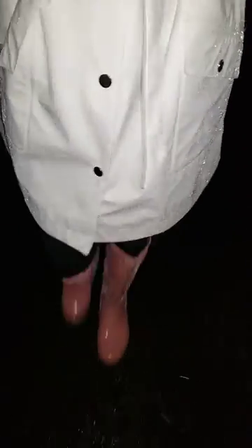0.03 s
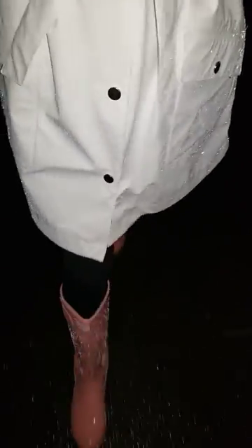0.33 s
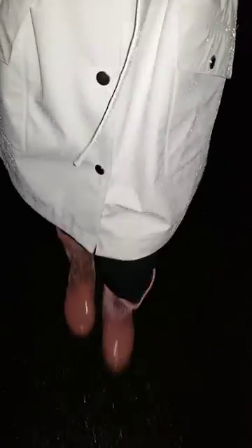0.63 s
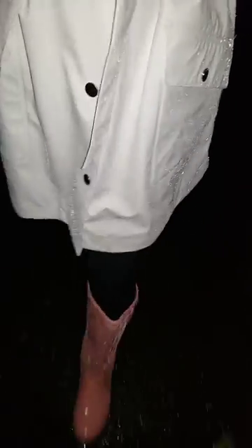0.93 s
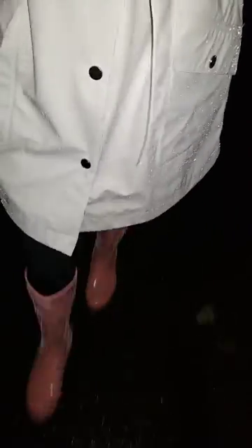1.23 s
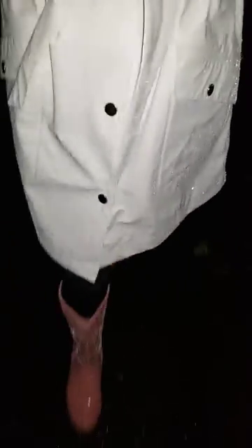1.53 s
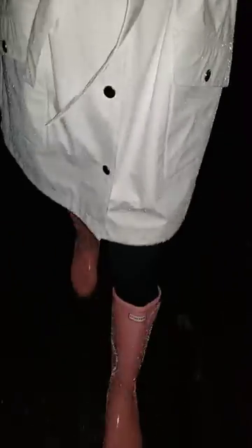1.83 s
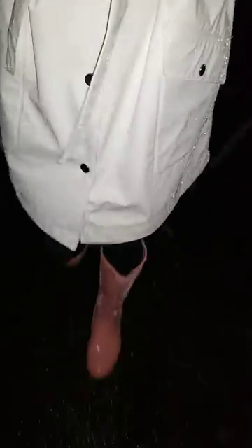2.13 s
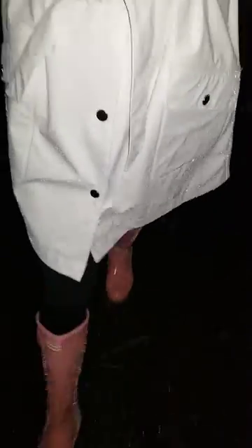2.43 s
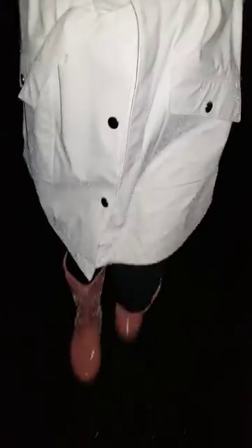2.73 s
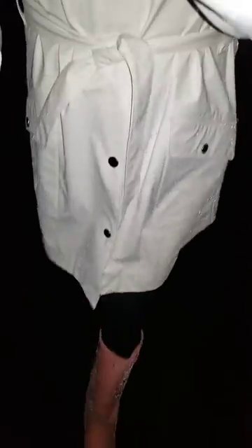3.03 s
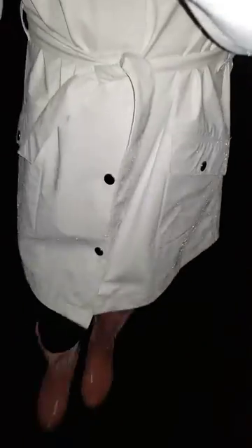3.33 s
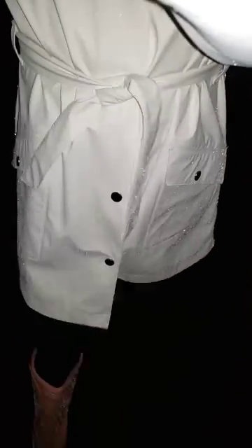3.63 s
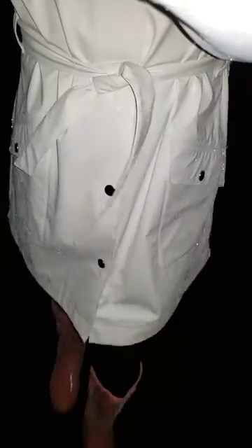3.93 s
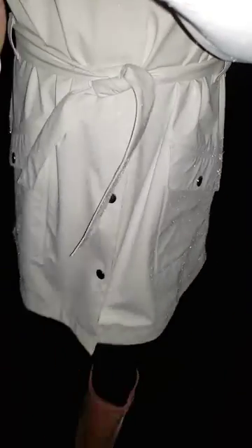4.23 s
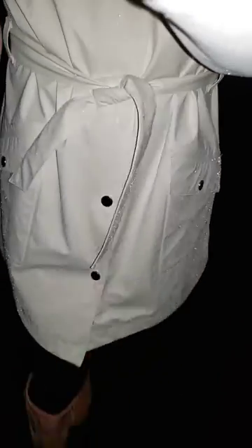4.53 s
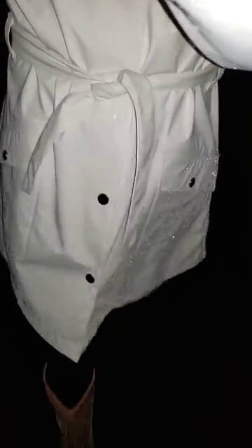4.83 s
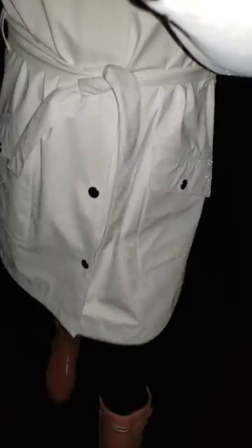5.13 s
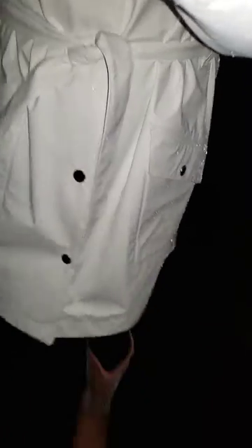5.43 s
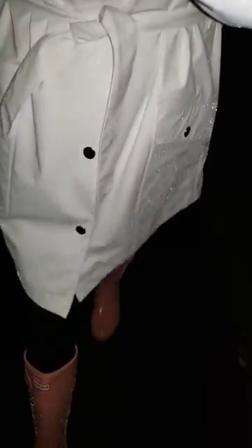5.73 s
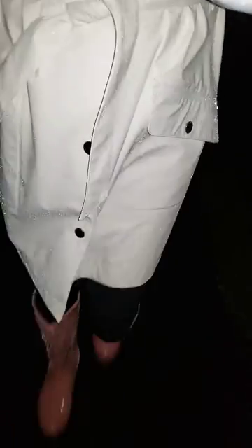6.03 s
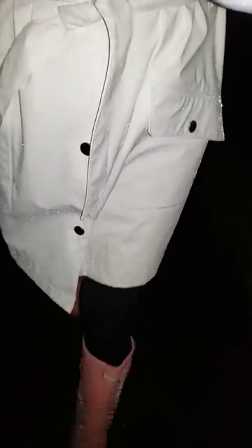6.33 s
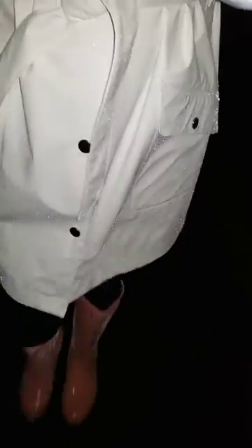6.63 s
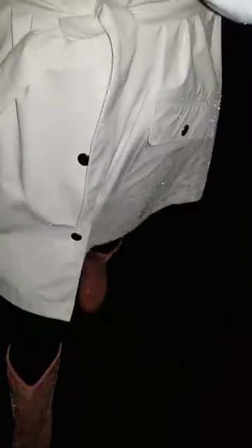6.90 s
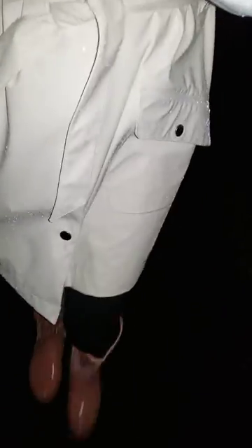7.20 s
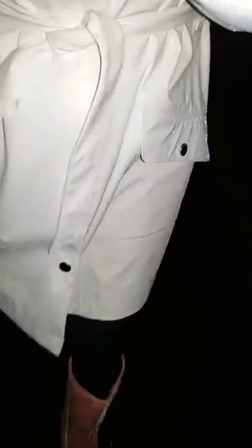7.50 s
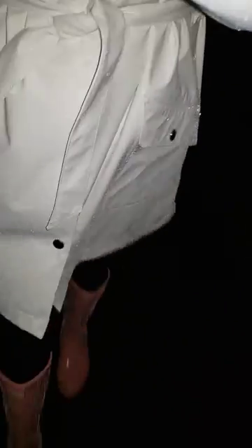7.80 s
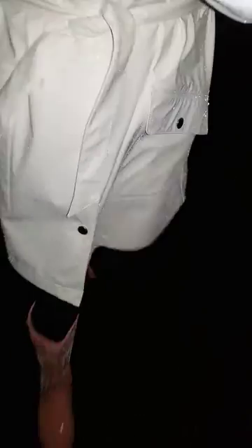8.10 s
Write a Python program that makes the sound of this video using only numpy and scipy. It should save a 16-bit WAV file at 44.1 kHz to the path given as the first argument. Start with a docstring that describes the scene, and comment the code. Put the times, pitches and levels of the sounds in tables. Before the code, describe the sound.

Steady rain fizzes and patters on the ground and a raincoat, close to the microphone, outdoors with no echo. Small drops tick on the cloth throughout, over a faint low rumble and a dull wash of distant rain. At about 0.5 seconds a wet surface gives a tiny creak, followed until 1 second by a cluster of hollow, cracking taps on the coat. More taps come singly between 1.4 and 3 seconds. The rain builds to its strongest around 3.6 seconds, with one firm thump, then eases. From about 3.8 seconds, wind buffets the microphone in low, uneven gusts that jump between left and right, strongest around 4 to 5.3 and 6.5 to 7 seconds. At 7 seconds the hiss suddenly dips and creeps back, while a run of fat drops splats on the coat and another gust arrives around 8 seconds.

```python
"""Steady rain fizzes on the ground and on a raincoat, close to the two microphone ports of a camera
held pointing down by someone walking at night in rubber boots. At arm's length, single drops tick
and thump on the slack cloth, and a wet surface creaks once. Further off lie a dull wash of rain
and a low rumble. From halfway on, wind buffets each port on its own."""
import sys
import numpy as np
from scipy import signal
from scipy.fft import rfft, irfft
from scipy.io import wavfile
from scipy.ndimage import uniform_filter1d

SR = 44100
rng = np.random.default_rng(int(sys.argv[2]) if len(sys.argv) > 2 else 0)


def master_out(mix):
    """Clip the mix to full scale and print it as 16-bit PCM to the path in sys.argv[1]."""
    frames = np.transpose(np.atleast_2d(mix))
    ceiling = np.clip(frames, -1, 1)
    pcm = np.round(ceiling * 32767).astype(np.int16)
    wavfile.write(sys.argv[1], SR, pcm)


N = 364266
TIME, HZ = np.arange(N) / SR, np.fft.rfftfreq(N, 1 / SR)
PORT_LAG_S = 0.0004346  # sound from the front reaches the left port first


def gain_of(db):
    """Decibels to amplitude."""
    return 10 ** (np.asarray(db) / 20)


def unit_rms(x):
    """Scales to rms 1."""
    return x / np.sqrt(np.mean(x ** 2) + 1e-20)


def spectrum_at(rows, hz, column=1):
    """One column of a spectrum table, joined on a log-frequency axis."""
    table = np.array(rows)
    return np.interp(np.log(hz + 1), np.log(table[:, 0] + 1), table[:, column])


def fader(rows, column=1):
    """One dB column of a level curve as a gain for every sample."""
    table = np.array(rows)
    return gain_of(np.interp(TIME, table[:, 0], table[:, column]))


def coloured(x, colour):
    """Causal (minimum-phase) filter with the given spectrum."""
    hz = abs(np.fft.fftfreq(8192, 1 / SR))
    log_gain = np.log(gain_of(spectrum_at(colour, hz)))
    response = np.fft.ifft(np.exp(np.conj(signal.hilbert(log_gain)))).real
    return signal.fftconvolve(x, response[:len(response) // 2])[:len(x)]


def add(mix, s, sound):
    """Mixes a sound in at time s."""
    part = mix[max(round(s * SR), 0):][:len(sound)]
    part += sound[:len(part)]


def swell(depth_db, low_hz, high_hz):
    """A random gain that wanders at rates mostly between the two frequencies."""
    shape = (HZ > low_hz) / np.sqrt(HZ + low_hz) / (1 + (HZ / high_hz) ** 2)
    wander = irfft(rfft(rng.standard_normal(N)) * shape, N)
    return gain_of(depth_db * unit_rms(wander))


# Open-air rumble all around, its spectrum: f/Hz, relative level/dB
RUMBLE_COLOUR = [(28, -24), (60, -4.5), (125, -6), (220, -11.5), (400, -19.5), (1500, -48), (4000, -99)]
# Its strength at the microphone: t/s, level/dB
RUMBLE_LEVEL = [(0, -50), (.8, -47), (1.2, -49), (1.6, -45), (2.5, -47), (3.6, -48), (7.0, -48.5),
                (8.26, -43.5)]

def rumble(apart=0.28):
    """A low, uneven outdoor rumble, mostly common to both ports."""
    common, left, right = (coloured(rng.standard_normal(N), RUMBLE_COLOUR) for _ in range(3))
    unevenness = swell(depth_db=3.0, low_hz=5, high_hz=22)
    return fader(RUMBLE_LEVEL) * unit_rms((common + apart * np.array([left, right])) * unevenness)


# Rain on the ground further off, its spectrum: f/Hz, relative level/dB
FAR_COLOUR = [(100, -17), (400, -4.5), (950, -0.5), (1800, -11.5), (5000, -56)]
# Its strength at the microphone: t/s, level/dB
FAR_LEVEL = [(0, -63), (2, -49.5), (5.4, -69.5), (6.1, -48.5), (8.26, -50)]

def far_rain(lag_s=0.00032):
    """The smooth, dull wash of rain on the ground ahead, reaching the left port first."""
    wash = unit_rms(coloured(rng.standard_normal(N), FAR_COLOUR))
    late_wash = np.interp(TIME - lag_s, TIME, wash)
    return fader(FAR_LEVEL) * np.array([wash, late_wash])


# Wind pressure right on a port: f/Hz, relative level/dB
WIND_COLOUR = [(22, -17), (42, -1.5), (62, 5), (115, -5), (160, -10.5), (220, -18), (320, -31), (500, -54),
               (1200, -48), (4000, -100)]

def turbulence(steadiness=0.25, window=1300):
    """Low pressure noise of rms 1, its own lumps partly smoothed out."""
    pressure = unit_rms(coloured(rng.standard_normal(N), WIND_COLOUR))
    power = uniform_filter1d(uniform_filter1d(pressure ** 2, window), window // 2)
    return unit_rms(pressure / (abs(power) + 1e-4) ** (steadiness / 2))


def puffs(rows):
    """Bell-shaped swells of air speed, as a gain for each port."""
    out = np.zeros((2, N))
    for s, port, db, width_s in rows:
        out[port] += gain_of(db) * np.exp(-.5 * ((TIME - s) / width_s) ** 2)
    return out


# Breeze on the microphone: t/s, left level/dB, right level/dB
# On the right, the wind noise cuts out abruptly near 7 s and returns at the end.
BREEZE = [(0, -73, -73), (1.9, -46.5, -59), (4.85, -53, -42), (5.4, -40, -30), (6.3, -45, -38),
          (6.95, -28.5, -19.5), (7.0, -31, -63), (7.9, -34, -65), (8.26, -34, -36)]
# Gusts on one port: t/s, port (0 left, 1 right), level/dB, width/s
GUSTS = [(3.28, 0, -38.5, 0.078), (3.83, 0, -36, 0.068), (3.92, 1, -27, 0.17), (4.47, 0, -23.5, 0.1),
         (4.47, 1, -28.5, 0.098), (4.97, 1, -24.5, 0.037), (6.88, 1, -24.5, 0.054), (7.44, 0, -25.5, 0.039),
         (8.02, 0, -30, 0.11), (8.08, 1, -27, 0.054)]

def wind():
    """Each port has its own turbulence: a lumpy flutter that follows breeze and gusts, with lulls."""
    lulls = [unit_rms(swell(depth_db=3.2, low_hz=5.5, high_hz=13)) for _ in range(2)]
    breeze = np.array([fader(BREEZE, column) for column in (1, 2)]) * lulls
    return np.array([strength * turbulence() for strength in np.hypot(breeze, puffs(GUSTS))])


# Single eddies on one port: t/s, port (0 left, 1 right), level/dB, width/s, mean swing f/Hz
EDDIES = [(1.752, 1, -17.5, 0.0064, 100), (3.93, 1, -13, 0.016, 87.8), (4.504, 0, -19.5, 0.0071, 75),
          (4.988, 1, -17, 0.0069, 70.1), (5.223, 1, -14.5, 0.0087, 90.1), (5.268, 1, -15, 0.015, 70.6),
          (5.294, 1, -20, 0.0095, 159.8), (5.372, 1, -24, 0.0086, 105), (5.71, 1, -22.5, 0.016, 90.2),
          (6.167, 1, -20.5, 0.0077, 104.8), (6.505, 1, -9.5, 0.016, 61.3), (6.767, 1, -13, 0.0078, 75),
          (6.878, 1, -21, 0.0038, 200), (6.895, 1, -20, 0.0078, 65), (7.07, 0, -26.5, 0.02, 109.9),
          (7.08, 0, -34, 0.035, 269.5), (7.215, 0, -23, 0.015, 99.6), (7.22, 0, -34, 0.016, 290)]

def eddies():
    """A passing eddy swings the pressure at one port to and fro a few times, at an uneven pace."""
    pace = swell(depth_db=3.6, low_hz=30, high_hz=135)
    clock = np.cumsum(pace / pace.mean()) / SR
    return sum(puffs([puff]) * np.sqrt(2) * np.sin(2 * np.pi * hz * clock) for *puff, hz in EDDIES)


def creak(s=.4618, slip_hz=500, db=-25, width_s=0.00033, count=4):
    """A wet surface sticks and slips a few times in quick, uneven succession: a dull, short creak."""
    out, age = np.zeros(N), TIME[:512] / width_s
    slip = uniform_filter1d(age * (2 - age) * np.exp(-age), size=14)
    for k in range(count):
        slip_at_s = s + (k + rng.uniform(-0.039, 0.098)) / slip_hz
        add(out, slip_at_s, gain_of(db) * rng.uniform(0.37, 1.3) * slip / slip.max())
    return out


def shower(per_s, spread_db, decay_s, spray, spray_s, wash, limit=3.4):
    """Envelope of many drops of uneven size: a sharp burst, a little spray after it, and a far wash."""
    sizes = gain_of(spread_db * np.minimum(rng.exponential(1, N), limit))
    impacts = sizes * (rng.random(N) < per_s / SR)
    t = TIME[:SR // 20]
    drop_power = np.exp(-2 * t / decay_s) + spray ** 2 * np.exp(-2 * t / spray_s)
    power = abs(signal.fftconvolve(impacts ** 2, drop_power)[:N])
    return np.sqrt(power / power.mean() + wash ** 2)


def dip(s=6.966, fall_s=.004, depth_db=-5.8, recover_s=0.42):
    """The hiss of the near rain drops suddenly once and creeps back."""
    since = np.maximum(TIME - s, 0)
    return gain_of(depth_db * np.minimum(since / fall_s, 1) * np.exp(-since / recover_s))


# Near rain as each port hears it: f/Hz, left relative level/dB, right relative level/dB
RAIN_COLOUR = [(100, -16, -17), (350, -5.3, -6.8), (700, -4.5, -8.5), (1050, -0.8, -4.8),
               (1600, -1.8, -5.3), (1900, -6.3, -7.3), (2400, -4, -4.3), (3100, -10.3, -9.3),
               (4100, -10, -8), (5800, -12.9, -10.1), (7400, -13, -8.6), (9400, -8.8, -10.8),
               (11800, -2.9, -4.7), (15500, -2.7, -4.9)]
# How alike the two ports hear it: f/Hz, coherence (0-1)
COHERENCE = [(100, 1), (500, 0.14), (1200, 0.78), (2300, 0.3), (3300, 0.15), (5000, 0), (16000, 0.35)]

def at_ports(envelope, band):
    """Drop noise at the two ports: partly alike, the right one late, each with its own colour."""
    left, unrelated = rfft(envelope * rng.standard_normal((2, N)))
    alike = np.clip(spectrum_at(COHERENCE, HZ), 0, 1)
    delay = np.exp(-2j * np.pi * HZ * PORT_LAG_S)
    right = (alike * left + np.sqrt(1 - alike ** 2) * unrelated) * delay
    colour = gain_of([spectrum_at(RAIN_COLOUR, HZ, column) for column in (1, 2)])
    return unit_rms(irfft(np.array([left, right]) * colour * band, N))


# How hard the rain beats near the microphone: t/s, relative level/dB
RAIN_LEVEL = [(0, -54.5), (.65, -49), (1.3, -51), (1.6, -44.5), (2.1, -42.5), (2.4, -46.5), (2.95, -43),
              (3.28, -39.5), (3.62, -37), (3.84, -37.5), (3.93, -43), (4.35, -43), (4.65, -46.5),
              (5.75, -48), (6.2, -45.5), (6.9, -48), (8.26, -48.5)]
USUAL_RAIN_DB = -45.5

def near_rain(split_hz=3100, patter_db=0.7, fizz_db=8.5, shared=0.21):
    """Fat drops patter on cloth and grass in flurries; fine ones fizz, some nearer to one port."""
    low_band = 1 / np.sqrt(1 + (HZ / split_hz) ** 8)
    high_band = np.sqrt(1 - low_band ** 2)
    fat = shower(per_s=130, spread_db=3.5, decay_s=.0022, spray=.15, spray_s=.009, wash=1.15)
    fine = [shower(per_s=450, spread_db=5, decay_s=.0005, spray=.2, spray_s=.006, wash=1.25)
            for _ in range(3)]  # left, right, both
    flurries = swell(depth_db=1.35, low_hz=3.7, high_hz=37)
    patter = at_ports(fat, low_band) * fader(RAIN_LEVEL) * gain_of(patter_db)
    fizz = at_ports(np.hypot(fine[:2], shared * fine[2]), high_band) * fizz_gain() * gain_of(fizz_db)
    return (patter + fizz) * flurries * dip()


def fizz_gain(follow=0.99, lean=0.07):
    """The fizz grows with the rain and leans to the left port as the rain passes its usual level."""
    excess_db = 20 * np.log10(fader(RAIN_LEVEL)) - USUAL_RAIN_DB
    db_per_db = follow + lean * np.array([[1], [-1]])
    return gain_of(USUAL_RAIN_DB + db_per_db * excess_db)


def dripping(colour, db, per_s, follow):
    """Separate small drops land on the coat and hood, somewhat harder when the rain is strong."""
    drops = [shower(per_s, spread_db=3.5, decay_s=.0009, spray=.18, spray_s=.007, wash=0, limit=2.4)
             for _ in range(3)]  # left, right, both
    bursts = np.hypot(drops[:2], drops[2]) * rng.standard_normal((2, N))
    drips = np.array([coloured(burst, colour) for burst in bursts])
    strength = (fader(RAIN_LEVEL) / gain_of(USUAL_RAIN_DB)) ** follow
    return gain_of(db) * strength * unit_rms(drips)


# Bright tick of a fine drop, close up: f/Hz, relative level/dB
TICK_COLOUR = [(1000, -24), (6000, -16), (9000, -8), (12500, 0)]
# Duller slap of a fat drop, close up: f/Hz, relative level/dB
SLAP_COLOUR = [(400, 5.5), (1100, 10), (2350, 0.5), (3100, 6), (6500, -3.5), (10000, -1.5)]

def coat_drips():
    """Light ticks and slaps keep falling on the cloth, within arm's length of the microphone."""
    ticks = dripping(TICK_COLOUR, db=-45, per_s=40, follow=.15)
    slaps = dripping(SLAP_COLOUR, db=-49.5, per_s=30, follow=.55)
    return (ticks + slaps) * dip()


def drop(colour, decay_s, spray, spray_s):
    """One drop: a noisy burst of about unit level that dies at once, and a little spray after it."""
    t = TIME[:2048]
    envelope = np.exp(-t / decay_s) + spray * np.exp(-t / spray_s)
    burst = coloured(np.sign(rng.standard_normal(len(t))) * envelope, colour)
    return burst / np.linalg.norm(burst) * np.sqrt(decay_s * SR)


# Fine drops right beside the microphone: t/s, left relative level/dB, right relative level/dB
SNAPS = [(.1545, -42, -27), (.1815, -37, -32), (.6626, -37, -28), (.8997, -24, -22), (.9065, -38, -26),
         (1.2698, -39, -30), (1.3844, -36, -25), (1.5549, -39, -23), (1.9285, -40, -26), (2.3237, -37, -24),
         (2.5982, -23, -24), (2.6962, -32, -21), (3.076, -37, -24), (3.1526, -32, -24), (3.5022, -19, -26),
         (3.6331, -19, -28), (4.2224, -42, -22), (4.3065, -33, -18), (4.3288, -30, -20), (5.5438, -38, -25),
         (6.8198, -25, -30), (6.9528, -42, -23), (7.1374, -34, -25), (7.283, -33, -29)]

def snaps(boost_db=6.5):
    """A fine drop bursts so close that it is mostly louder at one port."""
    out = np.zeros((2, N))
    for s, *port_db in SNAPS:
        for port, db in enumerate(port_db):
            tick = drop(TICK_COLOUR, decay_s=.0003, spray=.09, spray_s=.004)
            add(out[port], s, gain_of(db + boost_db) * tick)
    return out


# Fat drops on the coat, at arm's length: t/s, relative level/dB
SPLATS = [(.297, -42), (.331, -41), (1.117, -39), (2.031, -35), (2.696, -29.5), (3.842, -29), (4.028, -35),
          (4.244, -31), (4.321, -34), (4.887, -36), (5.355, -34), (5.641, -34), (5.994, -36), (7.237, -41),
          (7.324, -37), (7.367, -39), (7.491, -40), (7.642, -38), (7.674, -36), (7.764, -40),
          (7.839, -36.5), (7.873, -37.5), (7.969, -34), (8.0865, -34.5), (8.2015, -35), (8.24, -39)]

def splats(boost_db=5.8):
    """A fat drop gives a round slap with a bright spatter that both ports hear."""
    out = np.zeros((2, N))
    for s, db in SPLATS:
        slap = drop(SLAP_COLOUR, decay_s=.0012, spray=.14, spray_s=.006)
        for port in range(2):
            spatter = drop(TICK_COLOUR, decay_s=.0011, spray=.13, spray_s=.005)
            add(out[port], s + port * PORT_LAG_S, gain_of(db + boost_db) * (slap + spatter))
    return out


# Crack of wet cloth, close up: f/Hz, relative level/dB
CRACK_COLOUR = [(300, 4.5), (1000, 5), (1600, -1.5), (2600, 3.5), (4000, -2.5), (6000, -3.5), (8000, -17),
                (13000, -2.5), (16000, 1)]
# Drops and flaps on the coat by the microphone: t/s, left level/dB, relative crack level/dB, thump f/Hz
COAT_TAPS = [(.5, -21.5, -6, 820), (.632, -17.5, 6.5, 690), (0.7169, -28.5, 9, 650),
             (0.7816, -25.5, -12, 750), (0.824, -18.5, -3.5, 520), (0.875, -26, 4.5, 500),
             (0.899, -18, 4.5, 620), (.932, -28, -14, 500), (1.367, -26, -13, 221), (1.414, -28, -5, 280),
             (1.5525, -19.5, -17, 242), (1.984, -23, -2, 229), (2.631, -18.5, -16, 725),
             (3.077, -27, -12, 467), (3.133, -24.5, -15, 228), (3.716, -15, -12, 580),
             (5.939, -24.5, 0.5, 345), (8.107, -19, -20, 620)]

def coat_taps(crack_boost_db=2.5, crack_s=.0016, cycles=0.51, ring=0.099, ring_hz=480, ring_s=0.014,
              rebound_s=0.007, rebound_db=-9, right_db=-2, lag_s=0.00029):
    """Slack cloth is pushed in and springs back with a hollow ring and a wet crack, then rebounds."""
    out, t = np.zeros((2, N)), TIME[:2048]
    hollow = ring * np.sin(2 * np.pi * ring_hz * t) * np.exp(-t / ring_s)
    for s, db, crack_db, hz in COAT_TAPS:
        push = np.sin(2 * np.pi * hz * t) * np.exp(-(hz * t / cycles) ** 2)
        thump = push / push.max() + hollow
        rebound_at_s = s + rebound_s * rng.uniform(0.94, 1.1)
        for port, side_db in enumerate((0, right_db)):
            crack = coloured(np.sign(rng.standard_normal(len(t))) * np.exp(-t / crack_s), CRACK_COLOUR)
            crack *= gain_of(crack_db + crack_boost_db) / abs(crack).max()
            tap = gain_of(db + side_db) * (thump + crack)
            add(out[port], s + port * lag_s, tap)
            add(out[port], rebound_at_s + port * lag_s, gain_of(rebound_db) * tap)
    return out


def scene():
    """Rain, near drops and wind in the open air, with no echo."""
    rain = coat_drips() + near_rain() + far_rain()
    close_up = coat_taps() + snaps() + splats() + creak()
    return rain + close_up + wind() + eddies() + rumble()


def record(dry):
    """The recorder's band limit cuts the highest treble."""
    edge_hz = 15900
    lowpass = signal.firwin(511, edge_hz, window=("kaiser", 9), fs=SR)
    return signal.oaconvolve(dry, lowpass[None], "same")


dry = scene()
out = record(dry)
master_out(out)
```